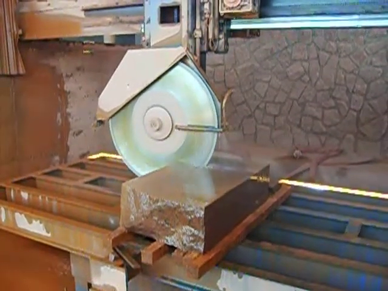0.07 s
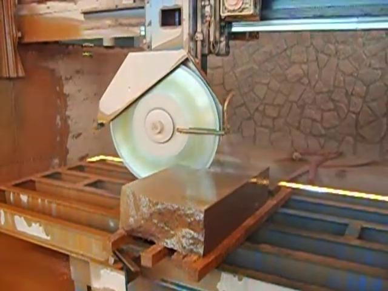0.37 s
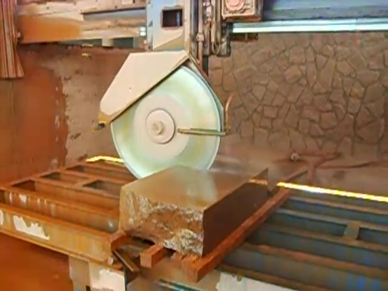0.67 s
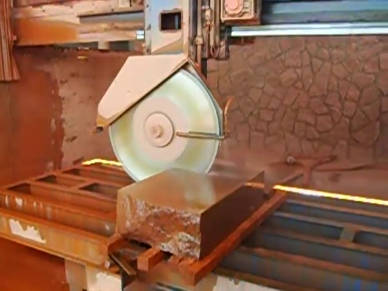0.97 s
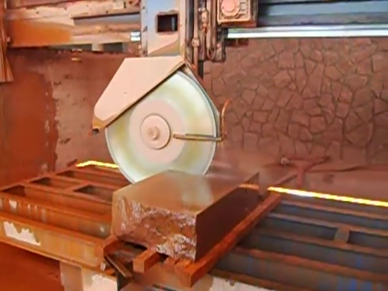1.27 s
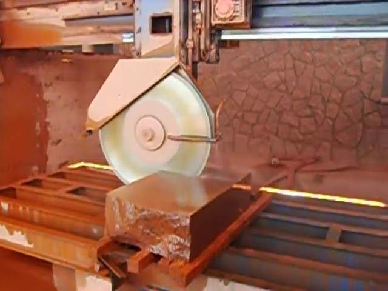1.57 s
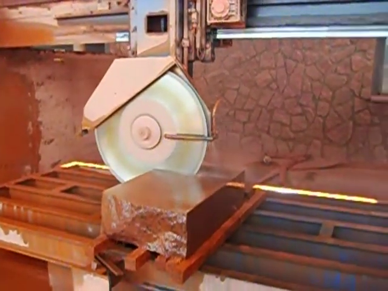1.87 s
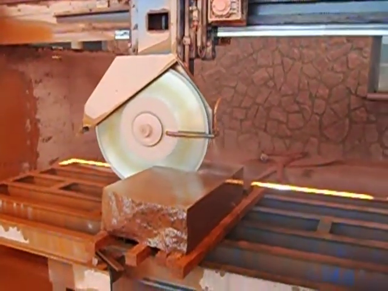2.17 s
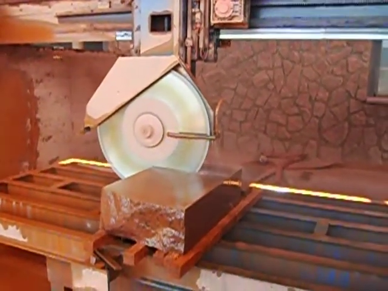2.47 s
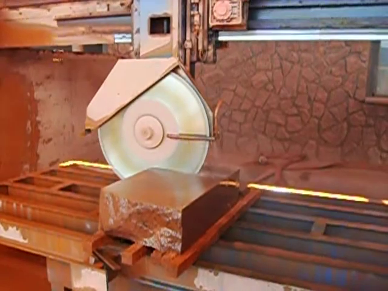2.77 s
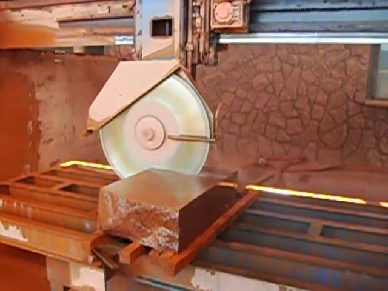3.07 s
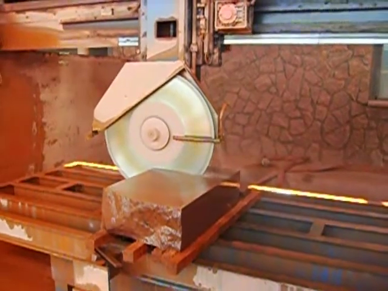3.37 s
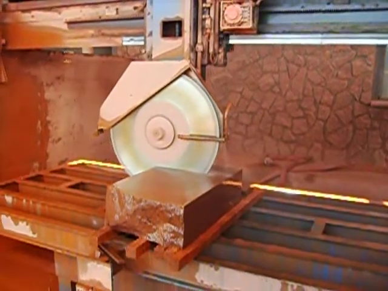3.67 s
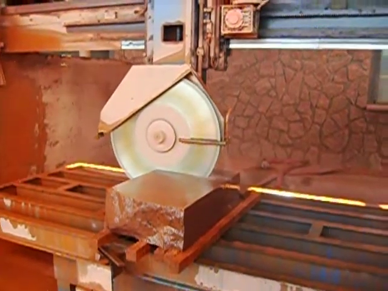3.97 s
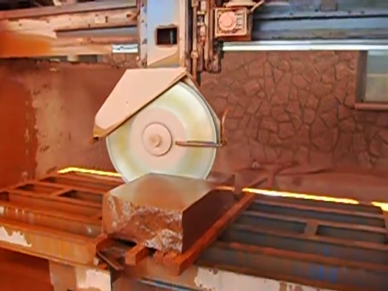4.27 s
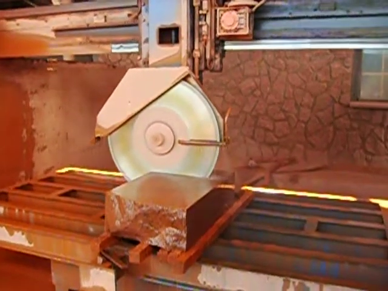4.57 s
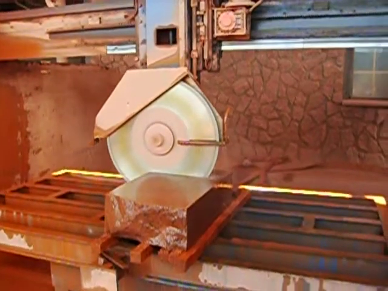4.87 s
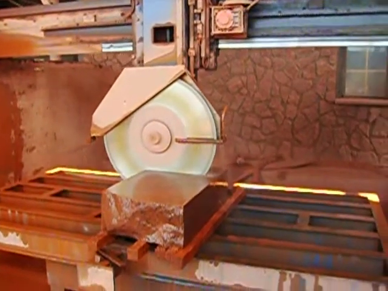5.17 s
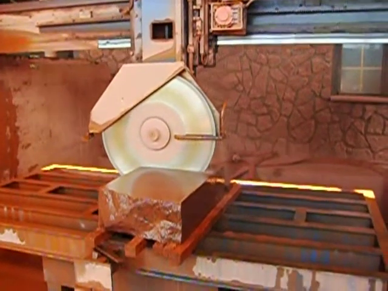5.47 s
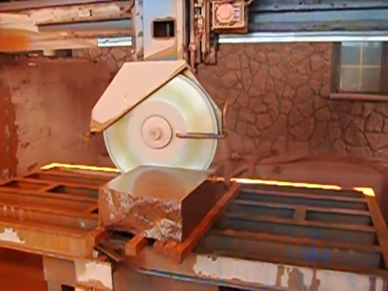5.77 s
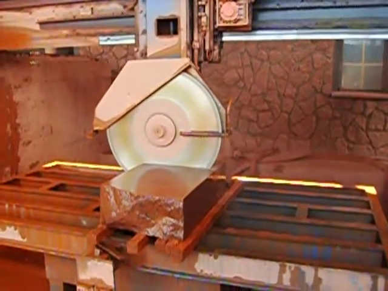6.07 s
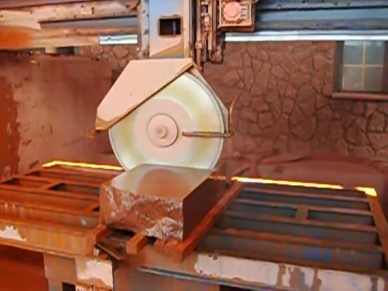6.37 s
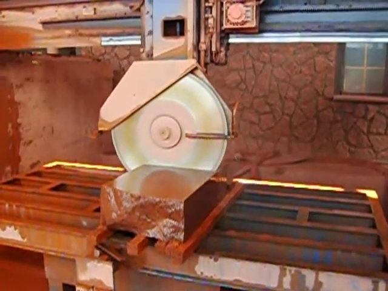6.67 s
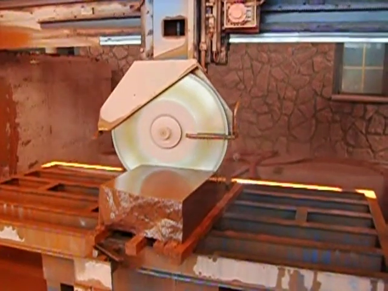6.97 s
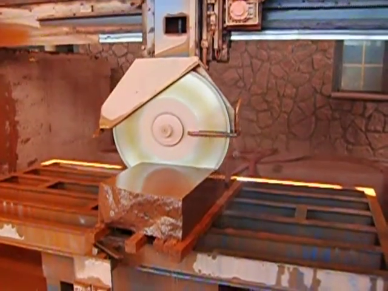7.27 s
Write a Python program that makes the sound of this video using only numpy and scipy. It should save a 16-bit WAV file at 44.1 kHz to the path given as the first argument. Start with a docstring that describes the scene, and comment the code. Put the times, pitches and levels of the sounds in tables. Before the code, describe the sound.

A big saw blade whines and rings briefly, then digs into wet stone with a quick rasp. From there a gritty, fast-fluttering grind runs on under a loud, shrill whine whose overtones swell and fade at a nearly constant pitch. Rushing water spray and air, a motor hum and a low machine drone fill the workshop throughout, with a few soft puffs of air on the microphone.

```python
"""A shrill whine over a roar of air and cooling water: a large bridge saw in a stone workshop.
The toothed blade spins freely and rings, then bites into a wet block with a short rasp.
In the cut the teeth whine louder and their grinding nearly repeats with every turn.
Underneath, the frame drones at multiples of the shaft speed, the motor sings and moving air rumbles."""
import sys
import numpy as np
from scipy import signal
from scipy.fft import rfft, irfft, next_fast_len
from scipy.io import wavfile
from scipy.ndimage import map_coordinates

SR = 44100
rng = np.random.default_rng(int(sys.argv[2]) if len(sys.argv) > 2 else 0)


def wav_record(signal):
    """Record a signal, one row per channel, as 16-bit PCM in the file named by sys.argv[1]."""
    frames = np.transpose(np.atleast_2d(signal))
    bounded = np.clip(frames, -1, 1)
    # unit amplitude maps onto the largest positive 16-bit level
    quanta = np.round(bounded * 32767).astype(np.int16)
    wavfile.write(sys.argv[1], SR, quanta)


N = 332073
TIME = np.arange(N) / SR
TOUCH_S, BITE_S = 0.88, 1.39  # the teeth graze the stone, then dig in


def gain_of(db):
    """Decibels to amplitude."""
    return 10 ** (np.asarray(db) / 20)


def unit_rms(x):
    """Scales to rms 1."""
    return x / np.sqrt(np.mean(abs(x) ** 2) + 1e-20)


def curve(rows, column=1):
    """One column of a time table as an envelope, at every sample."""
    columns = np.transpose(rows)
    return np.interp(TIME, columns[0], columns[column])


def coloured(x, points):
    """Shapes a sound with an EQ curve (f/Hz, level/dB), at rms 1."""
    size = next_fast_len(N)
    hz, db = np.transpose(points)
    eq_db = np.interp(np.log(np.fft.rfftfreq(size, 1 / SR) + 1), np.log(hz), db)
    return unit_rms(irfft(rfft(x, size) * gain_of(eq_db), size)[:N])


def drift(rate_hz, size=2048):
    """Smooth random modulation of rms 1, rolling off above the given rate."""
    hz = np.fft.rfftfreq(size, N / SR / size)
    slow = irfft(rfft(rng.standard_normal(size)) * np.exp(-(hz / rate_hz) ** 2))
    return np.interp(TIME, np.linspace(0, N / SR, size), unit_rms(slow))


def tone(cycles, db, waver, rate_hz):
    """A sine whose many paths through the shop make its level and phase waver."""
    angle = 2 * np.pi * (cycles + rng.random())
    direct = 1 + waver * drift(rate_hz)
    scattered = waver * drift(rate_hz)
    return gain_of(db) * unit_rms(direct * np.sin(angle) + scattered * np.cos(angle))


def turning_noise(turns, memory, size=2048):
    """Noise looped round the rim: each turn keeps a share of the last turn's pattern."""
    fresh = rng.standard_normal((int(turns[-1]) + 2, size))
    renewal = np.sqrt(1 - memory ** 2)
    rim, _ = signal.lfilter([renewal], [1, -memory], fresh[1:], axis=0, zi=memory * fresh[:1])
    return unit_rms(map_coordinates(rim.ravel(), [turns * size], order=3, mode="nearest"))


def high_tone_db(free_db, cut_db, flare_db, delay_s, width_s):
    """Level of a high tone: a rise on contact, one flare after the bite, and a slow random swell."""
    settled_db = np.interp(TIME, [TOUCH_S, BITE_S], [free_db, cut_db])
    flare = np.exp(-((TIME - BITE_S - delay_s) / width_s) ** 2)
    swell_db = 3.2 * (1 - flare) * drift(rate_hz=1.3)
    return settled_db + flare_db * flare + swell_db


# thin tone: free level/dB, cutting level/dB, flare/dB, delay after bite/s, half-width/s
THIN_TONE_ENVELOPE = (-78, -68, 16, .26, .35)

def thin_tone():
    """A faint, thin tone at a steady 11.7 kHz, swelling as the whine's eighth harmonic flares."""
    return tone(11735 * TIME, high_tone_db(*THIN_TONE_ENVELOPE), waver=.42, rate_hz=18)


# EQ of the air rumble: f/Hz, relative level/dB
RUMBLE_EQ = [(8, -12), (22, 10), (45, -2), (90, -9), (200, -35), (600, -80)]
# soft puffs of air: t/s, level/dB, half-width/s
PUFFS = [(0.617, -43, 0.13), (1.45, -38, 0.067), (2.3, -46, .1), (2.482, -38, 0.098), (4.91, -36, .06)]

def buffeting():
    """Moving air rumbles on the microphone, with a few soft puffs."""
    puffs = sum(gain_of(db) * np.exp(-((TIME - at) / width) ** 2) for at, db, width in PUFFS)
    return (gain_of(-54.0) + puffs) * coloured(rng.standard_normal(N), RUMBLE_EQ)


# EQ of the air and water bed: f/Hz, relative level/dB
ROAR_EQ = [(12, -22), (25, -22), (60, -13.5), (160, -16.5), (330, -9.5), (460, -14.0), (560, -4.5),
           (800, -3.5), (1050, -4.5), (1400, 0.0), (1900, -3), (2500, -2.5), (3400, -7), (4800, -9.5),
           (6800, -16.5), (10300, -26.5), (11800, -46), (12400, -62)]

def roar(turns):
    """Water spray and air dragged round by the blade; a little of it repeats with each turn."""
    swirl = rng.standard_normal(N) + gain_of(-5.0) * turning_noise(turns, memory=0.955)
    return gain_of(-20.5 + 0.067 * drift(6)) * coloured(swirl, ROAR_EQ)


# motor tones: f/Hz, level/dB
MOTOR_TONES = [(98, -58), (550.5, -56), (591, -51), (612.5, -40.2), (831, -45.5)]

def motor():
    """The motor sings at steady pitches."""
    return sum(tone(hz * TIME, db, waver=0.082, rate_hz=2.5) for hz, db in MOTOR_TONES)


def groan_db(order):
    """The drive groans once under the load: shaft orders near one resonance swell and fade."""
    nearness = np.exp(-((order - 23.5) / 1.2) ** 2)
    peak_db, at_s, width_s = 7, 2.0, .7
    return peak_db * nearness * np.exp(-((TIME - at_s) / width_s) ** 2)


# envelope of the boom at the frame's resonance: t/s, level/dB
BOOM_LEVEL = [(0, -39), (.3, -42), (.72, -35), (1.2, -37), (1.8, -34.5), (2.7, -37.5), (3.6, -34),
              (4.39, -31.5), (4.76, -37.5), (5.05, -48), (5.6, -39), (7.5, -40.5)]
# three drone mixes: multiple of shaft speed (rounded in use), level/dB free, early cut, deep cut
DRONE_MIXES = [(3, -52.5, -62, -58), (5, -65, -53, -57.5), (6, -58.5, -43.5, -56.5), (7, -79, -49.5, -47),
               (8, -46.5, -52, -44.5), (10.2, -60, -39.5, -41), (11.07, -45.5, -58, -68),
               (12, -65, -44, -54), (13, -40, -66, -40.5), (14, -58, -53, -58), (15, -53.5, -49, -45),
               (18, -59, -45.5, -51.5), (19, -54, -52.5, -42.5), (20, -58, -58, -43),
               (22, -47.5, -50.5, -51.5), (23, -46, -44.5, -49), (24, -52, -42.5, -53), (25, -43, -53, -67),
               (27, -49, -39, -37.5)]
# morph between the mixes as the head travels: t/s, position (0 free, 1 early cut, 2 deep cut)
DRONE_MORPH = [(1.1, 0.15), (1.6, .6), (3.4, 1.23), (4.5, 1.5), (5.2, 1.7), (6.3, 1.95)]

def frame_drone(turns):
    """The shaft knocks the frame once a turn, ringing it near 200 Hz."""
    boom_order, trim_db = 9, -0.4
    morph = curve(DRONE_MORPH)
    orders = [(boom_order, curve(BOOM_LEVEL))]
    orders += [(round(order), np.interp(morph, [0, 1, 2], levels)) for order, *levels in DRONE_MIXES]
    drone = np.zeros(N)
    for order, db in orders:
        # orders near the resonance stay in step and throb; the room scatters the higher ones
        lag = 0.8 * np.arctan(order - boom_order) + 0.46 * drift(1.34)
        lag += rng.uniform(0, 2 * np.pi) * (order > boom_order + 2)
        partial = unit_rms(np.cos(2 * np.pi * order * turns - lag))
        drone += gain_of(db + trim_db + groan_db(order)) * partial
    return drone


# modes of the steel disc: f/Hz, base level/dB
BLADE_MODES = [(5792, -38), (6062, -48), (7994, -48)]
# fader ride on the ringing: t/s, gain/dB
RING_RIDE = [(0, 1), (.25, 2.5), (.5, 2.5), (.7, -4), (1.2, -3)]

def blade_ring(load):
    """The bare steel disc rings until the stone damps it."""
    envelope = np.clip(1 - load, 0, 1) * gain_of(curve(RING_RIDE))
    return envelope * sum(tone(hz * TIME, db, waver=.4, rate_hz=8) for hz, db in BLADE_MODES)


# EQ of the rasp: f/Hz, relative level/dB
RASP_EQ = [(2500, -35), (4200, -14), (4600, 0), (4850, 4), (5300, -10), (6600, -12), (9000, -35)]

def first_bite():
    """A short rasp as the teeth break the edge of the block."""
    level_db, delay_s, width_s = -24, 0.055, .05
    burst = np.exp(-((TIME - BITE_S - delay_s) / width_s) ** 2)
    return gain_of(level_db) * burst * coloured(rng.standard_normal(N), RASP_EQ)


# the rim entering the block: t/s, share of the cutting edge in the stone (0-1)
RIM_CONTACT = [(1.18, 0.12), (1.32, 0.35), (1.41, 0.93)]
# the feed through the stone: t/s, relative grinding level/dB, treble lift/dB
FEED = [(1.4, -23, 1), (1.55, -24.5, 0), (2.3, -21.8, 0.1), (3.3, -21.5, 1.5), (4.1, -22.5, 1),
        (5.5, -21.5, -.5), (6.3, -21, -1.5), (7.5, -22.5, 2)]

def feed():
    """Load on the blade (0 free, about 1 in the cut) and the dB of extra grit from harder stone."""
    feed_db = curve(FEED)
    load = curve(RIM_CONTACT) * gain_of(feed_db - np.median(feed_db))
    return load, curve(FEED, column=2)


# EQ of teeth grinding stone: f/Hz, relative level/dB
GRIND_EQ = [(500, -50), (1500, -24.5), (2200, -5.5), (3000, -4), (3700, -2), (4800, 1.5), (5700, -0.5),
            (6800, -6.5), (8500, -16), (10200, -19.5), (11000, -30), (11900, -36.5), (12400, -54)]
# tones raised by uneven teeth: multiple of shaft speed, level/dB at load 1
UNEVEN_TONES = [(99, -40), (110, -44), (112, -43.5), (115, -38), (118, -44), (129, -39), (161, -58),
                (165, -40), (172, -38.5), (186, -41.5), (194, -45), (210, -48), (215, -43)]

def grinding(turns, load, grit_db):
    """Diamond grit scrapes much the same track on every turn, while loose grains crumble at random."""
    track = turning_noise(turns, memory=0.847)
    track = coloured(track, [(2000, -1), (4300, -1.5), (5500, -4.0), (9000, -1.5)])
    crumble = coloured(rng.standard_normal(N), [(2000, -6.5), (4000, -2), (5500, -0.5), (9000, -2.5)])
    scrape = coloured(track + gain_of(-4.5) * crumble, GRIND_EQ)
    treble = signal.sosfiltfilt(signal.butter(2, 5800, "high", fs=SR, output="sos"), scrape)
    scrape += (gain_of(grit_db) - 1) * treble
    # the blade runs slightly out of true, so it presses harder once a turn
    pressure = gain_of(.5 * np.sin(2 * np.pi * turns) + 0.69 * turning_noise(turns, memory=.995, size=24))
    tones = sum(tone(order * turns, db, waver=0.28, rate_hz=5.3) for order, db in UNEVEN_TONES)
    return load * (gain_of(-18.5) * pressure * scrape + tones)


def standing_wave_db(rows):
    """Level through the crests and nodes of a standing wave: round swells, narrow dips."""
    return 20 * np.log10(curve([(at, gain_of(db)) for at, db in rows]))


# the whine's four loud harmonics, each swelling with standing waves in the shop: t/s, level/dB
WHINE_1 = [(0, -31), (1.15, -31.5), (1.33, -23), (1.55, -31), (2.45, -35.5), (2.85, -27.5), (4.1, -37.5),
           (4.47, -21.5), (5.1, -23), (6, -22), (7.5, -25.5)]
WHINE_2 = [(0, -33.5), (.65, -35), (.95, -27.5), (1.13, -38), (1.33, -19), (1.65, -19.5), (2.19, -14.5),
           (2.58, -19), (2.85, -33), (3.28, -33), (3.72, -17.7), (4.07, -19.5), (4.32, -38), (4.55, -22),
           (4.87, -30), (5.3, -19.3), (6.7, -17), (7.5, -21)]
WHINE_3 = [(0, -35), (1.13, -33.5), (1.36, -26.5), (1.85, -24.5), (2.55, -23.5), (2.9, -24), (3.03, -35),
           (3.3, -25.5), (3.5, -33), (3.99, -34), (4.26, -24), (4.65, -40), (5.25, -21.5), (5.6, -30.5),
           (5.92, -23.5), (6.4, -27), (7.02, -22), (7.5, -35)]
WHINE_4 = [(0, -43), (.9, -40.5), (1.35, -28), (1.8, -19.5), (2.3, -32), (2.55, -26), (3.35, -31),
           (3.8, -32), (5.3, -30.5), (5.95, -25), (6.35, -37), (7.1, -35), (7.45, -26.5)]
# shrill top: harmonic, free level/dB, cutting level/dB, flare/dB, delay after bite/s, half-width/s
WHINE_TOP = [(5, -47, -33, 5.5, 0.089, 0.33), (6, -52, -38.5, 7, 0.87, 0.18),
             (7, -60, -43.5, 11.5, 0.21, 0.17), (8, -63, -48, 14.5, 0.29, 0.32)]

def whine(turns):
    """Teeth pass the stone and the guard about 1280 times a second; high overtones scatter most."""
    passes = 57 * turns  # 57 teeth
    partials = tone(passes, standing_wave_db(WHINE_1), waver=0.13, rate_hz=21)
    partials += tone(2 * passes, standing_wave_db(WHINE_2), waver=.047, rate_hz=53)
    partials += tone(3 * passes, standing_wave_db(WHINE_3), waver=0.17, rate_hz=12.4)
    partials += tone(4 * passes, standing_wave_db(WHINE_4), waver=.25, rate_hz=16)
    for harmonic, *envelope in WHINE_TOP:
        partials += tone(harmonic * passes, high_tone_db(*envelope), waver=0.28, rate_hz=35)
    return partials


# shaft speed, sagging slightly in the cut: t/s, speed/(turns/s)
SHAFT_SPEED = [(0, 22.55), (1.4, 22.536), (2, 22.511), (2.8, 22.476), (5, 22.479), (6.5, 22.485)]

def scene():
    """One shaft turns under whine, grinding, roar and drone; the load trades ringing for grinding."""
    turns = np.cumsum(curve(SHAFT_SPEED)) / SR
    load, grit_db = feed()
    tones = whine(turns) + thin_tone()
    flutter = gain_of(0.7 * turning_noise(turns, memory=0.98, size=8))  # nearly repeats each turn
    lead = tones * flutter + first_bite() + grinding(turns, load, grit_db) + blade_ring(load)
    bed = roar(turns) + motor() + frame_drone(turns) + buffeting()
    return (lead + bed)[None]


def record(dry):
    """A soft clip rounds off the tallest peaks, then a steep low-pass limits the band."""
    ceiling, cutoff_hz = .76, 12200
    rounded = dry / (1 + (dry / ceiling) ** 8) ** (1 / 8)
    lowpass = signal.firwin(511, cutoff_hz, window=("kaiser", 9), fs=SR)
    return signal.oaconvolve(rounded, lowpass[None], "same")


dry = scene()
out = record(dry)
wav_record(out)
```